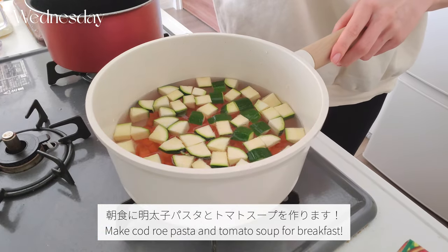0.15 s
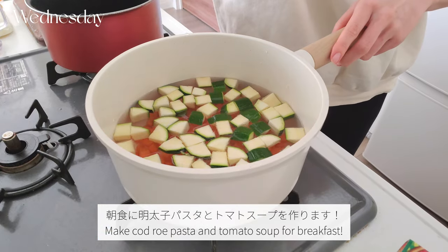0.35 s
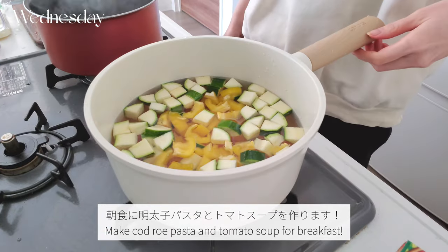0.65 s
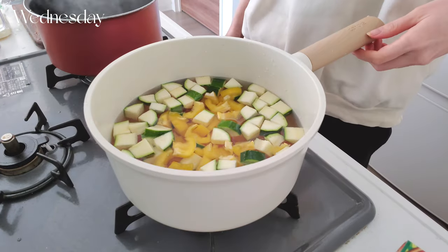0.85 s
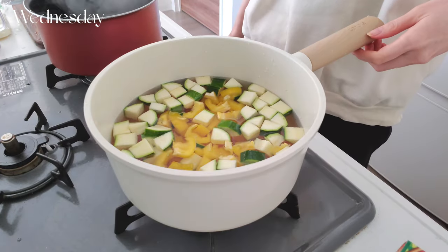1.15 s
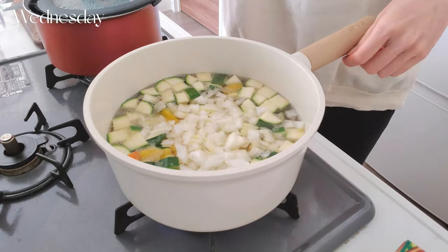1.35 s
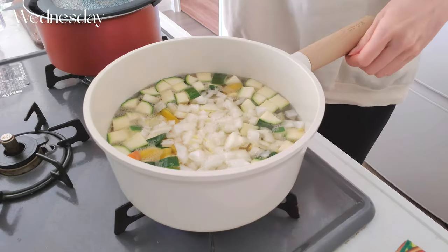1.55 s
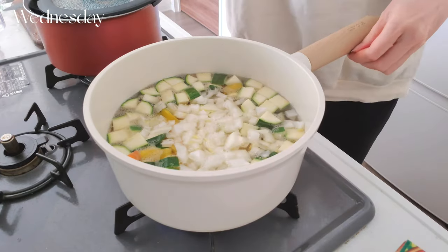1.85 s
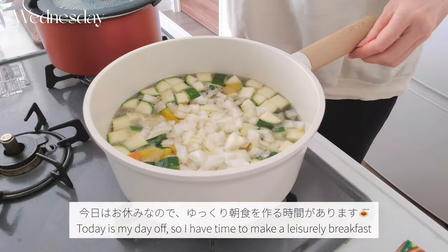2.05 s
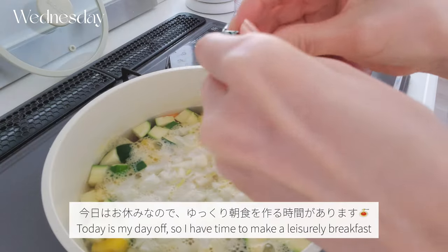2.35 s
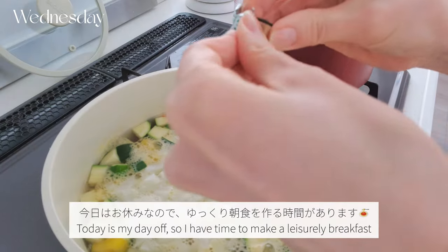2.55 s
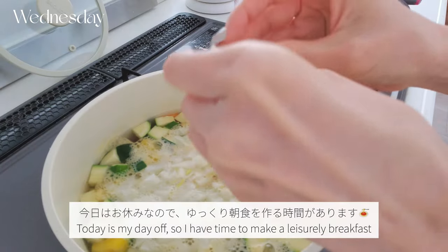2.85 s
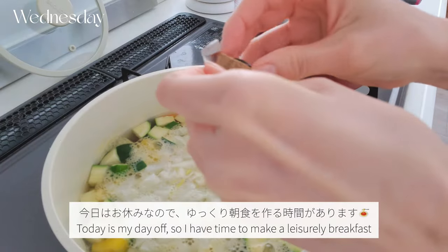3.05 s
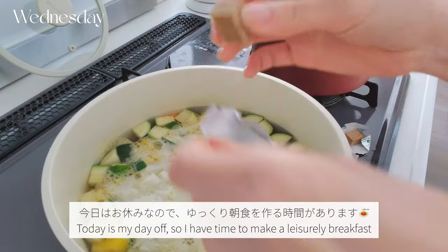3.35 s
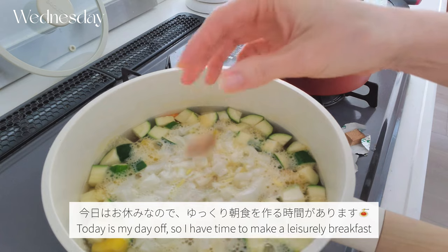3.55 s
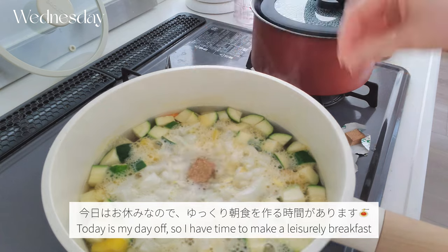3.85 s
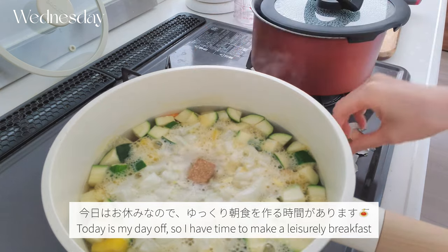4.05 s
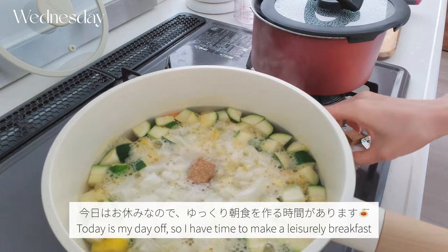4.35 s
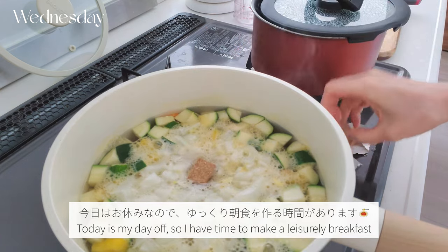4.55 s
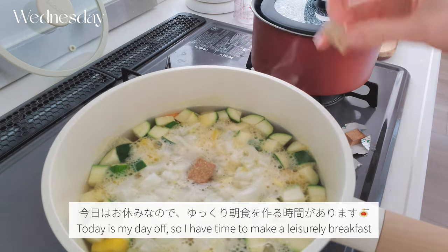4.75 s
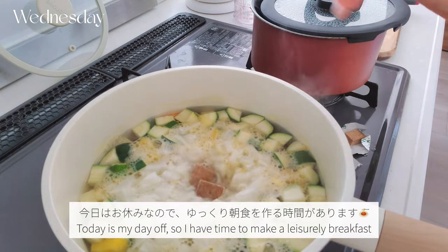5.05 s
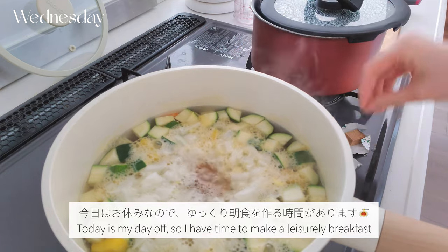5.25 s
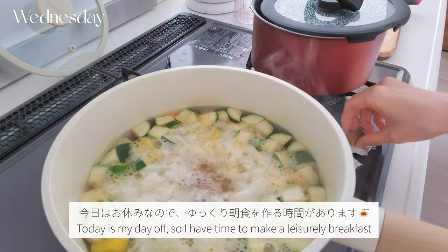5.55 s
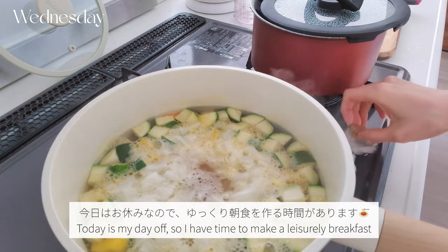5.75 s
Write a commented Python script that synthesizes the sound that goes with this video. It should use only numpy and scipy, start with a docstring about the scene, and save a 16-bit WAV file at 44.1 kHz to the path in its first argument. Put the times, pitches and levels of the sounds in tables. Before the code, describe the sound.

A gas flame fades in with a low, soft rumble and a light hiss, and moisture sizzles faintly on the hot pot at about 1.7 seconds. At 2.2 seconds the sound shifts to just above the pot, where the rumble continues with a faint, wavering gas whistle and the fine fizz of simmering soup. Fingers peel crackling foil until about 2.9 seconds. From 3.1 to 3.3 seconds a stock cube is pushed out in a quick run of sharp snaps and pops, the loudest moment. It plops into the soup at 3.7 seconds, between faint brushes of a sleeve. Light picking at a foil tray comes between 4 and 4.5 seconds. A second cube plops in, louder, at 5.1 seconds, and the fizz grows slightly. From 5.6 seconds the foil crinkles again, with two sharp snaps. The small kitchen gives the handling a short echo.

```python
"""Stock cubes into simmering soup

A gas flame rumbles and hisses, and moisture sizzles once on the hot pot. Then we listen from just
above the pot, where the soup fizzes and the gas jet faintly whistles. Fingers peel crackling foil and
push a stock cube out; it plops into the soup. A second cube is picked from its foil tray and dropped
in, and the fingers go back to the foil. The small kitchen gives the hand work a short echo."""
import sys
import numpy as np
from scipy import signal
from scipy.fft import rfft, irfft, next_fast_len
from scipy.io import wavfile
from scipy.ndimage import uniform_filter1d, map_coordinates

SR = 44100
rng = np.random.default_rng(int(sys.argv[2]) if len(sys.argv) > 2 else 0)


def dump_mix(stems):
    """Bounce the given channels to the path in sys.argv[1] as a 16-bit WAV at rate SR."""
    frames = np.atleast_2d(stems).T  # one column per channel
    limited = np.clip(frames, -1, 1)  # hard clip at full scale
    pcm = np.round(limited * 32767).astype(np.int16)
    wavfile.write(sys.argv[1], SR, pcm)


N = 259749
TIME = np.arange(N) / SR
LEAD_S, TRAIL_S = .2, .3  # time for a movement to swell before it starts and to fade after it ends


# The tone of the foil when peeled, pushed, picked at and grabbed: f/Hz, level/dB
PEEL_COLOUR = [(530, -29), (900, -5), (1090, -6.5), (1540, -11), (1990, -2), (2660, -1), (3110, -14),
               (3470, -3.5), (5010, -3.5), (6010, 0), (7300, -7), (8450, -1), (13900, -3.5), (15900, -8),
               (16500, -31)]
PUSH_COLOUR = [(350, -40.5), (600, -17), (961, -5), (1200, -6), (1320, -1.5), (1630, -14.5), (3000, -6.5),
               (3260, -7), (5750, -7), (7080, -9.5), (15000, -14), (15800, -16.5), (16500, -39.5)]
PICK_COLOUR = [(700, -35), (1100, -6), (1500, -13), (1750, -5), (2000, -8.5), (2870, -7), (3580, -5),
               (4200, -6), (4710, -0.5), (5500, -4.5), (6650, -8.5), (12400, -9), (15600, -12.5),
               (16500, -29.5)]
GRAB_COLOUR = [(650, -45), (1100, -14.5), (1510, -12.5), (1710, -6), (2490, -5), (2690, -0.5), (3450, -7.5),
               (4090, -1), (5560, -8), (8650, -5.5), (9800, -4.5), (15100, -11.5), (16500, -24.5)]
# Each named way of gripping the foil: tone table, creases per second, attack/(dB/s), boost/dB
GRIPS = {"peel": (PEEL_COLOUR, 1400, 1400, -.4), "push": (PUSH_COLOUR, 2200, 420, -1.6),
         "pick": (PICK_COLOUR, 650, 650, .7), "grab": (GRAB_COLOUR, 1200, 900, .3)}
# Finger strokes on the foil: grip, t/s, length/s, level/dB, swell during the stroke/dB
FINGER_STROKES = [("peel", 2.191, .008, -52, 0), ("peel", 2.251, .015, -45, 0), ("peel", 2.35, .1, -57, -7),
                  ("peel", 2.56, .08, -45.5, 3), ("peel", 2.76, .18, -42.5, -3),
                  ("push", 3.142, .085, -32.5, -1), ("push", 3.279, .018, -25.5, -2),
                  ("pick", 4.015, .07, -62, -4), ("pick", 4.29, .045, -48, 3),
                  ("pick", 4.368, .03, -48.5, -5), ("pick", 4.43, .07, -53, -4),
                  ("grab", 5.556, .04, -52, -8), ("grab", 5.645, .02, -47, 2),
                  ("grab", 5.715, .055, -46.5, -4), ("grab", 5.803, .008, -34, 0),
                  ("grab", 5.847, .045, -36, -4)]

def foil():
    """Rubbed foil buckles in many tiny creases, which come in clumps."""
    out = np.zeros((2, N))
    for grip, start, length, db, swell_db in FINGER_STROKES:
        colour, rate, attack, grip_db = GRIPS[grip]
        creases = shimmer(crackle(colour, rate, spread_db=3.5, scatter_s=.009), depth_db=3.3)
        gain = stroke(length, attack, release=600, swell_db=swell_db)
        add(out, start - LEAD_S, amp(db + grip_db) * shaped(creases, gain))
    return out * amp(1.3 * wobble(45))


# Big creases that snap: t/s, level/dB, low body/dB, ring f/Hz, lean to the left/dB
SNAPS = [(2.217, -41, -25, 5960, 0), (2.359, -44.5, -4, 10300, 8), (2.451, -46, -13, 9000, 2),
         (2.504, -45, -14, 5900, 1.5), (2.53, -44.5, -12.5, 9600, 2), (2.546, -39, -17.5, 9500, 2),
         (2.622, -39.5, -2, 6000, 4.5), (2.642, -40.5, -3, 4400, -1.5), (2.7588, -26, -16.5, 8560, -3.5),
         (2.786, -29, -6.5, 5750, -3.5), (2.82, -32, -11, 9500, 0), (2.825, -29.5, -18, 9800, -6),
         (2.837, -30, -9, 8300, -3.5), (2.878, -31.5, 7, 3320, -5.5), (4.302, -38.5, 0, 5510, -1.5),
         (4.365, -40, -5, 5630, 1), (4.431, -41, -4, 4680, 3), (5.7111, -27.5, -19, 4100, 0),
         (5.8455, -24.5, -6, 4130, 9)]
# The cube slips through its wrapper in jerks and breaks out with the last: same columns
SLIPS = [(3.144, -27, 1.5, 5510, -3), (3.222, -25.5, 2, 3760, 2.5), (3.2497, -26, 0, 3800, -0.5),
         (3.258, -26.5, 3.5, 3450, 1), (3.2795, -16.5, -1.5, 3760, 1), (3.286, -24, -6.5, 8610, 5),
         (3.2985, -16.3, 0, 8420, 9.5)]

def snaps():
    """A big crease flips with a sharp crack and rings a patch of foil; hands and pot scatter the sound."""
    out, t = np.zeros((2, N)), np.arange(SR // 12) / SR
    scatter = amp(-3.5) * decay(t, .04)
    for start, db, body_db, ring_hz, left_db in [*SNAPS, *SLIPS]:
        direct = amp([[left_db], [-left_db]]) * decay(t, .006)  # only the direct sound favours one side
        burst = rng.choice([-1, 1], (2, len(t))) * (direct + scatter)
        crack, body, ring = (7500, 7000, 0), (2090, 2200, body_db), (ring_hz, 660, 7.5)
        snap = ringing(burst, [crack, body, ring])
        onset_level = np.sqrt(np.mean(snap[:, :SR // 333] ** 2))  # over the first 3 ms
        add(out, start, amp(db - .9) * snap / onset_level)
    return out


# The notes of the emptied wrapper: f/Hz, width/Hz, level/dB
WRAPPER_NOTES = [(900, 450, -4.5), (3100, 440, -4.5), (3650, 170, -1.5), (4600, 130, -22.5),
                 (8000, 150, -2.5), (13400, 1800, 2.5)]

def with_hollow_wrapper(foil_sound):
    """As the cube breaks out, the foil's crackle makes the hollow wrapper ring."""
    out, start = foil_sound.copy(), SLIPS[-1][0] - LEAD_S
    gain = amp(-2.5) * stroke(length=.012, attack=370, release=260)
    breakout = shaped(foil_sound[:, round(start * SR):], gain)
    add(out, start, ringing(breakout, WRAPPER_NOTES))
    return out


def wrapper_pops():
    """Each slip of the cube pops the wrapper, ever higher, and nudges the fingers."""
    out, t = np.zeros((2, N)), np.arange(SR // 12) / SR
    first_hz, last_hz = 1002, 1487
    phase_lag = np.array([[0], [1.1]])  # the right side hears the pop a little later
    times = [row[0] for row in SLIPS]
    for start in times:
        travel = (start - times[0]) / (times[-1] - times[0])
        hz = first_hz + (last_hz - first_hz) * travel ** .68
        pop = np.sin(2 * np.pi * hz * t - phase_lag) * (1 - np.exp(-t / .000793))
        nudge = noise_band(len(t), hz=450, width=650)
        add(out, start, amp(-28) * decay(t, .038) * (pop + amp(-12) * nudge))
    return out


# Cubes hitting the soup: t/s, splash level/dB, gulp level/dB
PLOPS = [(3.656, -28, -29.5), (5.0725, -22.5, -25)]
# Air pockets that a cube drags under: f/Hz, width/Hz, level/dB
AIR_POCKETS = [(230, 150, -3), (510, 270, 1.5), (868, 140, 5), (2520, 520, -5.5)]

def plops():
    """A cube slaps the surface with a fine spray; just after, the soup closes over it with a dull gulp."""
    out, t = np.zeros((2, N)), np.arange(SR // 8) / SR
    for start, splash_db, gulp_db in PLOPS:
        spray = rng.standard_normal((2, len(t))) * decay(t, .043) * (1 - np.exp(-t / .0017))
        splash = filtered(spray, lambda f: resonance(f, hz=6000, width=45000))
        add(out, start, amp(splash_db - 5.5) * splash)
        churn = rng.standard_normal(len(t)) * decay(t, .024)
        gulp = ringing(churn, AIR_POCKETS)
        add(out, start + .003, amp(gulp_db) * gulp / np.abs(gulp).max())
    return out


# The notes of the stiff foil tray: f/Hz, width/Hz, level/dB
TRAY_NOTES = [(4590, 130, -1), (5025, 150, 0), (5650, 240, -3)]

def tray():
    """The second cube scrapes out of its foil tray and sets it ringing."""
    out, start = np.zeros((2, N)), 4.432
    scrape = crackle(PICK_COLOUR, rate=400, spread_db=3, scatter_s=.006)
    chime = unit(ringing(scrape, TRAY_NOTES))
    add(out, start - LEAD_S, amp(-56.5) * shaped(chime, stroke(length=.06, attack=250, release=380)))
    return out


# The tone of brushing cloth: f/Hz, level/dB
SLEEVE_COLOUR = [(880, -22), (1500, -11.5), (1980, -12), (2630, -1), (3110, -9.5), (3680, -2),
                 (5090, -13.5), (5780, -10), (7180, -13), (9750, -10.5), (15800, -14)]
# The arm swings over the pot and away: t/s, length/s, level/dB
ARM_SWINGS = [(3.609, 0.044, -50.5), (3.797, 0.034, -51.5)]

def sleeve():
    """Cloth brushes softly, swelling and fading with each swing of the arm."""
    out = np.zeros((2, N))
    for start, length, db in ARM_SWINGS:
        cloth = crackle(SLEEVE_COLOUR, rate=3000, spread_db=5, scatter_s=.0104)
        add(out, start - LEAD_S, amp(db + 1.3) * shaped(cloth, stroke(length, attack=148, release=148)))
    return out


# The tone of the flame from in front of the stove and from above the pot: f/Hz, level/dB
FLAME_FRONT = [(15, -60), (25, -22), (76, -1), (124, -2.5), (142, -1.5), (162, -8.5), (270, -6), (335, -20),
               (376, -24), (444, -11), (490, -14), (705, -12.5), (874, -23), (950, -28), (1300, -25.5),
               (1690, -50), (2860, -120)]
FLAME_CLOSE = [(15, -41.5), (30, -21.5), (59, -4), (112, -1), (171, -7.5), (257, -5), (366, -19.5),
               (452, -12.5), (494, -14), (560, -11.5), (728, -10.5), (800, -19), (870, -16), (1090, -25.5),
               (1700, -33), (2400, -38.5), (3000, -63)]

def flame(close):
    """Burning gas rumbles, and its deepest part flutters."""
    rumble = (1 - close) * amp(-46.9) * rush(FLAME_FRONT) + close * amp(-46.3) * rush(FLAME_CLOSE)
    flutter = wobble(14) * filtered(rumble, lambda f: f < 300)
    return rumble + amp(-13.5) * flutter


# The tone of the hissing gas: f/Hz, level/dB
GAS_COLOUR = [(650, -36), (1100, -15), (1290, -3), (1580, -10), (1870, -2.5), (2400, -4), (2880, -12.5),
              (3960, -15), (6820, -19.5), (9690, -17.5), (12900, -22.5), (15200, -13), (15900, -18.5),
              (16500, -21)]
# The hiss at each listening point in front of the stove: from t/s, level/dB
GAS_LEVELS = [(0, -65), (0.46, -59.8), (1.32, -63.5)]

def gas_hiss():
    """Flowing gas hisses, louder or softer as the listening point jumps."""
    starts, db = np.transpose(GAS_LEVELS)
    gain = amp(db[np.searchsorted(starts[1:], TIME)])
    return gain * shimmer(rush(GAS_COLOUR), depth_db=2.3)


# How loud the whistle is over time: t/s, level/dB
WHISTLE_LEVELS = [(2.3, -65.5), (3.7, -69), (4.06, -66.5), (4.55, -70), (4.7, -67), (5.0, -76), (5.26, -65),
                  (5.42, -71.5), (5.89, -63)]

def jet_whistle():
    """The gas jet whistles on one breathy note that wavers in loudness."""
    gain = amp(np.interp(TIME, *np.transpose(WHISTLE_LEVELS)))
    return gain * noise_band((2, N), hz=2229, width=51)


# The tone of the simmering soup: f/Hz, level/dB
FIZZ_COLOUR = [(1530, -46), (2600, -6.5), (3950, -12.5), (4360, -6.5), (5720, -14), (6130, -9),
               (8690, -3.5), (13600, -8), (15900, -6.5), (16500, -31)]

def soup_fizz():
    """The soup fizzes evenly, then grows louder as the second cube dissolves."""
    dissolving_s = np.maximum(TIME - PLOPS[-1][0], 0)
    return amp(-69.3 + 4.5 * dissolving_s) * shimmer(rush(FIZZ_COLOUR), depth_db=.7)


def sizzle():
    """Moisture sizzles off the hot pot with a faint song that rises as it dries."""
    out, t = np.zeros((2, N)), np.arange(2 * SR // 3) / SR - LEAD_S
    start, length = 1.67, .15
    hiss = noise_band((2, len(t)), hz=3500, width=4200)
    song_hz = np.interp(t, [0, length], [4900, 5400])
    flutter = noise_band((2, len(t)), hz=60, width=150)
    song = unit(flutter * np.sin(2 * np.pi * np.cumsum(song_hz) / SR))
    gain = amp(-69) * stroke(length, attack=80, release=45)
    add(out, start - LEAD_S, shaped(hiss + amp(-7) * song, gain))
    return out


def stove():
    """Flame and gas hiss fade in from the front; then, over the pot, we hear flame, whistle and fizz."""
    jump_s, fade_s, first_gain = 2.18, 2.02, .29
    close = np.clip((TIME - jump_s) * 100 + .5, 0, 1)  # 0 in front of the stove, 1 over the pot
    fade_in = np.interp(TIME, [0, fade_s], [first_gain, 1])
    return fade_in * (flame(close) + (1 - close) * gas_hiss() + close * (jet_whistle() + soup_fizz()))


# How long the kitchen's echo takes to fade by 60 dB at each pitch: f/Hz, t/s
ECHO_TIMES = [(200, 1), (1200, 0.22), (3500, 0.33), (8000, 0.18), (15000, 0.16)]

def kitchen_echo(x):
    """Hard walls answer with a short, bright tail."""
    hz, t, noise = signal.stft(rng.standard_normal((2, SR // 2)), SR, nperseg=256)
    tail = signal.istft(noise * decay(t, along(ECHO_TIMES, hz)[:, None]), SR, nperseg=256)[1]
    tail = np.pad(tail / np.linalg.norm(tail[0]), ((0, 0), (SR // 200, 0)))  # arrives 5 ms late
    return signal.fftconvolve(x, tail, axes=1)[:, :N]


# How alike left and right sound: f/Hz, likeness (1 is the same, 0 is unrelated)
LIKENESS = [(60, 0.97), (150, 0.99), (380, 0.84), (950, 0.17), (2380, -0.13), (5980, 0.076), (15000, 0.091)]

def rush(colour):
    """Steady noise of level 1, centred in the bass and spread wide in the treble."""
    def response(f):
        angle = np.arccos(np.clip(along(LIKENESS, f), -1, 1)) / 2
        return amp(along(colour, f)) * [np.cos(angle), np.sin(angle)]
    mid, side = filtered(rng.standard_normal((2, N)), response)
    return unit(np.array([mid + side, mid - side]))


def crackle(colour, rate, spread_db, scatter_s):
    """Tiny uneven clicks, rate a second; each reaches left and right by its own scattered paths."""
    n, t = 2 * SR // 3, np.arange(SR // 50) / SR
    clicks = (rng.random(n) < rate / SR) * amp(spread_db * np.clip(rng.standard_normal(n), -2, 2))
    power = np.abs(signal.fftconvolve(clicks ** 2, decay(t, scatter_s) ** 2)[:n])
    scattered = np.sqrt(power) * rng.standard_normal((2, n))
    return unit(filtered(scattered, lambda f: amp(along(colour, f))))


def shimmer(x, depth_db):
    """Make narrow bands of pitch come and go, as in foil that keeps changing shape; level 1."""
    bands = signal.stft(x, nperseg=512)[2]
    drift = uniform_filter1d(rng.standard_normal(bands.shape[1:]), size=4, axis=0)  # smooth in pitch
    drift = uniform_filter1d(drift, size=12, axis=1)  # and in time
    return unit(signal.istft(bands * amp(depth_db * unit(drift)), nperseg=512)[1][:, :x.shape[-1]])


def stroke(length, attack, release, swell_db=0):
    """Gain of one movement, from LEAD_S before it; it rises (attack) and dies (release) in dB a second."""
    t = np.arange(-LEAD_S, length + TRAIL_S, 1 / SR)
    edges_db = attack * np.maximum(-t, 0) + release * np.maximum(t - length, 0)
    return amp(swell_db * (np.clip(t / length, 0, 1) - .5) - edges_db)


def shaped(sound, gain):
    """A sound times a gain curve, cut to the shorter of the two."""
    n = min(sound.shape[-1], len(gain))
    return sound[..., :n] * gain[:n]


def noise_band(shape, hz, width):
    """Noise of level 1 gathered around one pitch."""
    return unit(filtered(rng.standard_normal(shape), lambda f: resonance(f, hz, width) ** 2))


def ringing(x, notes):
    """Let x ring an object's notes, each given as f/Hz, width/Hz, level/dB."""
    return filtered(x, lambda f: sum(amp(db) * resonance(f, hz, width) for hz, width, db in notes))


def resonance(f, hz, width):
    """How something that rings at hz answers frequency f; narrower rings longer."""
    return 1j * f * width / (hz * hz - f * f + 1j * f * width)


def filtered(x, response):
    """Scale each frequency f in x by response(f)."""
    n = x.shape[-1]
    padded = next_fast_len(n + 8192)
    return irfft(rfft(x, padded) * response(np.fft.rfftfreq(padded, 1 / SR)), padded)[..., :n]


def wobble(rate):
    """A smooth curve through random points, rate of them a second."""
    return map_coordinates(rng.standard_normal(int(N * rate / SR) + 4), [TIME * rate])


def along(points, hz):
    """Read a table of (f/Hz, value) at hz, on a musical (log) scale."""
    f, values = np.transpose(points)
    return np.interp(np.log(hz + 1), np.log(f + 1), values)


def add(track, start, x):
    """Mix x into the track at start seconds."""
    part = track[:, round(start * SR):][:, :x.shape[-1]]
    part += x[..., :part.shape[1]]


def decay(t, seconds):
    """A gain that falls by 60 dB in the given time."""
    return amp(-60 * t / seconds)


def amp(db):
    """Decibels to gain."""
    return 10 ** (np.asarray(db) / 20)


def unit(x):
    """Scale to an average (rms) level of 1."""
    return x / np.sqrt(np.mean(x ** 2) + 1e-20)


def scene():
    """Hand work and its echo, over the stove, which sits slightly to the right."""
    hands = with_hollow_wrapper(foil() + snaps()) + wrapper_pops() + tray() + plops() + sleeve()
    return hands + amp(-10) * kitchen_echo(hands) + (stove() + sizzle()) * amp([[-.5], [.5]])


# How much wider the stereo gets at each pitch: f/Hz, side boost/dB
STEREO_WIDTH = [(30, 5), (70, 4.5), (400, -2), (1200, 0.5), (2400, -1), (4400, 0.5), (8000, 0), (15000, 1)]

def record(dry):
    """Widen the stereo, mostly in the bass, and cut off the very highest treble."""
    top_hz = 15900
    mid = (dry[0] + dry[1]) / 2
    side = filtered((dry[0] - dry[1]) / 2, lambda f: amp(along(STEREO_WIDTH, f)))
    return filtered(np.array([mid + side, mid - side]), lambda f: f < top_hz)


dry = scene()
out = record(dry)
dump_mix(out)
```